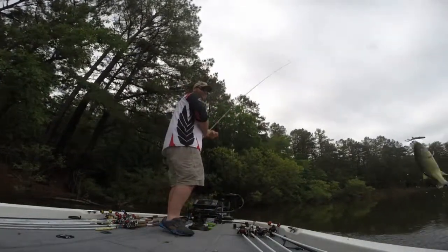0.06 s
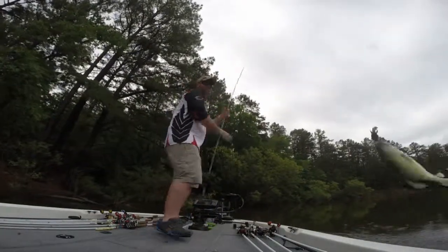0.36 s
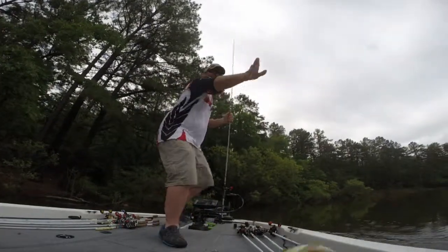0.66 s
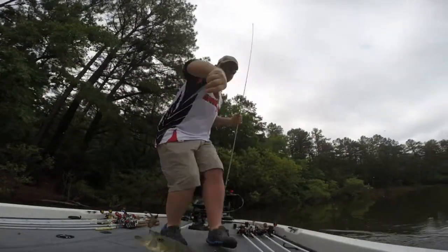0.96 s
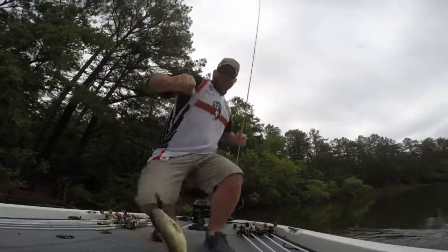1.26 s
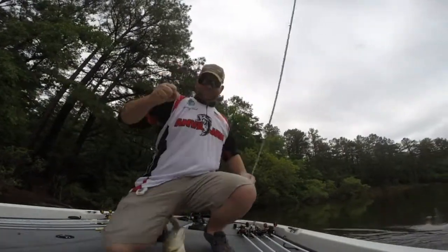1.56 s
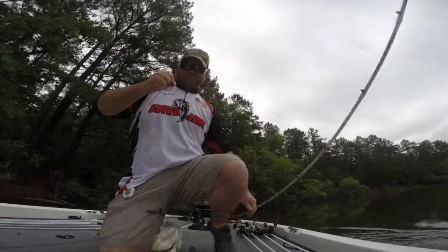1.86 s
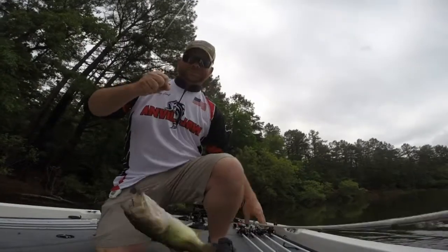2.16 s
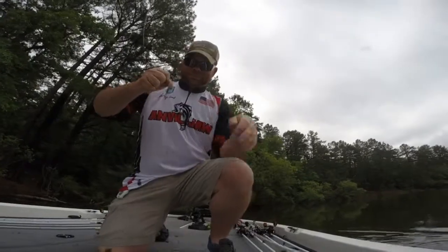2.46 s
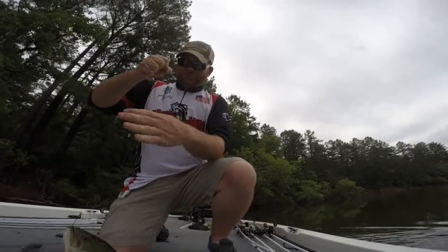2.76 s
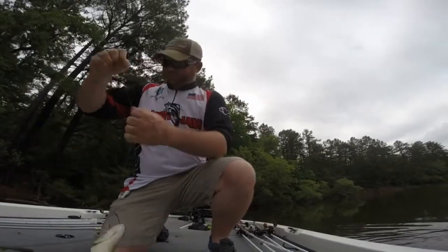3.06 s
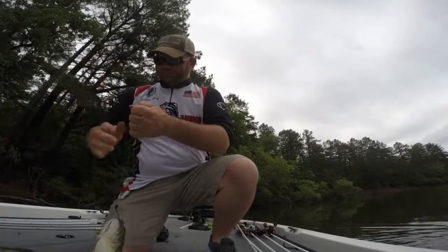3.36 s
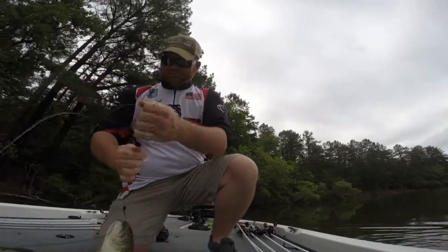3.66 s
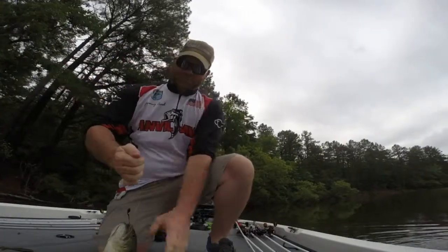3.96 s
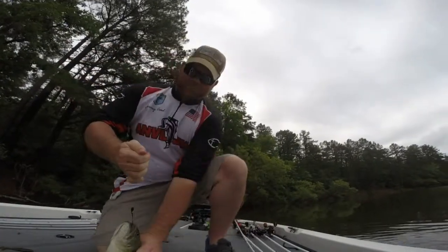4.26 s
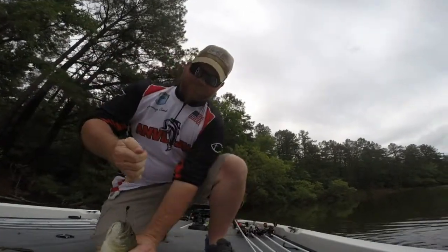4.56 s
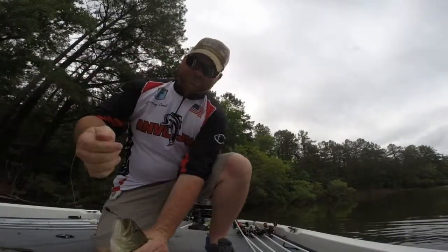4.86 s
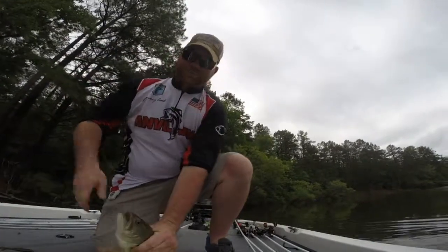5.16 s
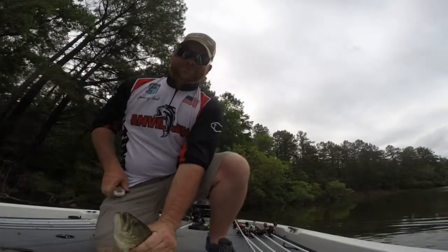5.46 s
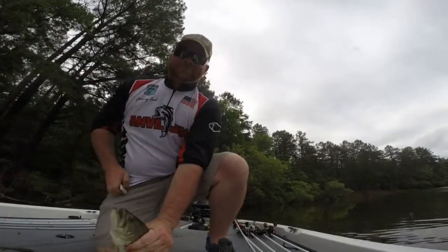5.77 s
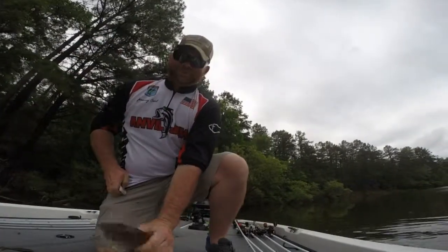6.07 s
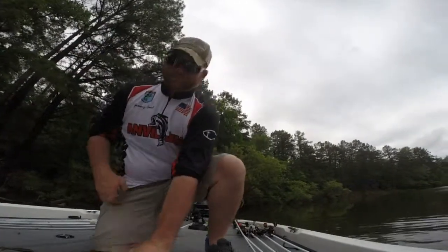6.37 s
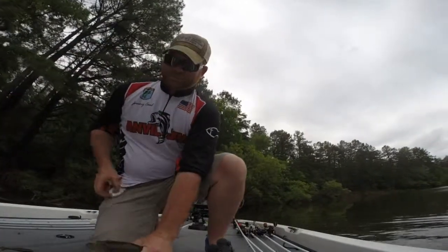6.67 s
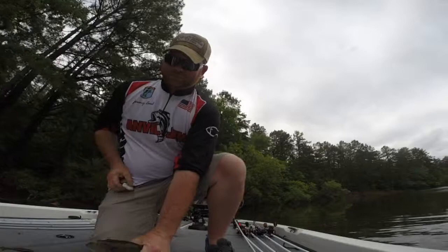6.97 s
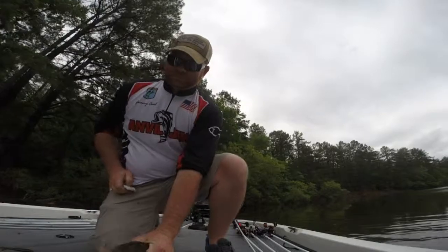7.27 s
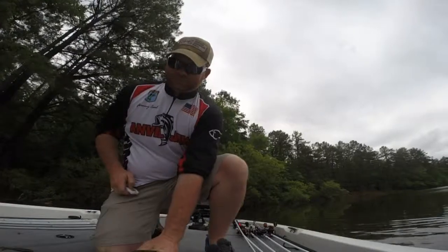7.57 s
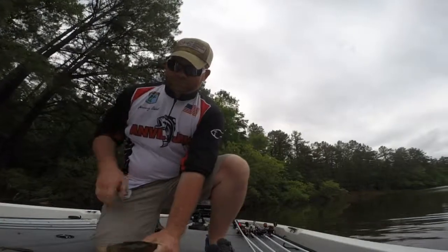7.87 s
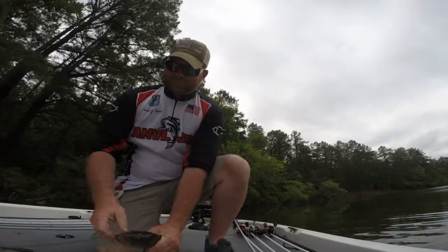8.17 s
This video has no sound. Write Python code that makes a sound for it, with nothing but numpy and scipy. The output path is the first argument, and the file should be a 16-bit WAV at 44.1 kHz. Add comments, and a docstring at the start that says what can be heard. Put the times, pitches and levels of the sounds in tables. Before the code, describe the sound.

A wet fish smacks and skids onto the carpeted deck of a small boat on a quiet lake. Feet and a knee thump on the hollow deck, then the fish flaps right against the microphone with loud, sharp slaps and scraping scales. A fishing rod clatters down. After that it is much quieter: faint clicks of hook and lure, one wet snap, and a low hull hum, with an electric motor rising softly at the end.

```python
"""On a small boat on a quiet lake, a wet bass lands on the carpeted deck and flaps against a camera.
Blows excite the hollow deck's normal modes; sliding scales and tackle make stick-slip noise.
A rod clatters down, the lure clicks and the held fish twitches. Beneath lie the hull's hum and rocking,
lake air, thin chirps, an electronic whine and an electric motor that swells softly at the end.
The camera's gain control ducks at the loudest blows and slowly recovers."""
import sys
import numpy as np
from scipy import signal
from scipy.fft import rfft, irfft
from scipy.io import wavfile
from scipy.ndimage import uniform_filter1d, minimum_filter1d, map_coordinates

SR = 44100
rng = np.random.default_rng(int(sys.argv[2]) if len(sys.argv) > 2 else 0)


def persist_wave(psi):
    """Save psi, clipped to +-1, as 16-bit WAV."""
    counts = np.round(np.clip(psi, -1, 1) * 32767).astype(np.int16)
    wavfile.write(sys.argv[1], SR, np.atleast_2d(counts).T)


N = 367353


def amp(db):
    """Decibels to amplitude ratio."""
    return 10 ** (np.asarray(db) / 20)


def unit(x):
    """Normalisation to rms 1."""
    return x / np.sqrt(np.mean(x ** 2) + 1e-20)


def clock(size):
    """Sample times in seconds."""
    return np.arange(size) / SR


def curve(rows):
    """Linear interpolation of (time [s], value) rows at every sample."""
    return np.interp(clock(N), *np.transpose(rows))


def wobble(rate):
    """Smooth random modulation: a spline through rate knots a second."""
    knots = rng.standard_normal(int(N * rate / SR) + 4)
    steps = np.linspace(0, len(knots) - 1, 8 * len(knots))
    return np.interp(clock(N) * rate, steps, map_coordinates(knots, [steps]))


def add(track, start, sound):
    """Superposition of a sound on the track from start [s]."""
    part = track[max(0, round(start * SR)):][:len(sound)]
    part += sound[:len(part)]


def impulse(spectrum, size=2048):
    """Minimum-phase impulse response of a body with these (frequency [Hz], level [dB]) rows."""
    hz, db = np.transpose(spectrum)
    gain = amp(np.interp(np.log(np.fft.rfftfreq(size, 1 / SR) + 1), np.log(hz), db))
    cepstrum = irfft(np.log(gain))
    cepstrum[1:size // 2] *= 2  # folding the cepstrum makes the response causal
    cepstrum[size // 2 + 1:] = 0
    return irfft(np.exp(rfft(cepstrum)))


def band(x, lo_hz, hi_hz):
    """Causal band-pass filtering."""
    return signal.sosfilt(signal.butter(3, [lo_hz, hi_hz], 'band', fs=SR, output='sos'), x)


def noise(spectrum):
    """Stationary noise of rms 1: white noise filtered to this spectrum."""
    body = impulse(spectrum, size=32768)
    return unit(signal.fftconvolve(rng.standard_normal(N + len(body) - 1), body, 'valid'))


def impacts(spectrum, times, levels_db, thud_db, crack_db, brighten, t60, ring_db, ring_t60,
            rise, grain_db, dulling=0, modes=110):
    """Source and filter: each contact drives a body's resonances with a crackle and a dense ring."""
    track, t, body = np.zeros(N), clock(SR // 10), impulse(spectrum)
    modes_hz = np.linspace(400, 7000, modes)[:, None]
    decay = amp(-60 * t / ring_t60 * np.maximum(1, modes_hz / 2500))  # high partials die sooner
    for start, db, thud in np.broadcast(times, levels_db, thud_db):
        clumps = amp(grain_db * np.interp(t, t[::40], rng.standard_normal(len(t[::40]))))
        crackle = rng.standard_normal(len(t)) * clumps * amp(-60 * t / t60)
        hz = modes_hz + 30 * rng.standard_normal((modes, 1))
        partials = rng.standard_normal((modes, 1)) * np.sin(2 * np.pi * hz * t) * decay
        ring = amp(ring_db) * partials.sum(0) / np.sqrt(modes / 2)
        force = (crackle + ring) * (1 - np.exp(-t / rise))
        sound = signal.fftconvolve(force, body)[:len(t)]
        crack = crack_db + brighten * (db - max(levels_db)) - dulling * thud  # slopes in dB per dB
        # each band carries the energy of 10 ms at its level
        for lo_hz, hi_hz, band_db in [(90, 950, thud), (950, 3500, 0), (3500, 16000, crack)]:
            part = band(sound, lo_hz, hi_hz)
            add(track, start, amp(db + band_db) * part / np.linalg.norm(part) * np.sqrt(SR / 100))
    return track


def friction(spectrum, middles, levels_db, lengths, treble_db, grain_db, grain_rate):
    """Stick-slip friction: surfaces catch and release in clumps; each stroke swells and fades."""
    grains = rng.standard_normal(N) * amp(grain_db * wobble(grain_rate))
    rub = unit(signal.fftconvolve(grains, impulse(spectrum))[:N])
    low_gain, high_gain = np.zeros((2, N))
    for middle, db, length, treble in np.broadcast(middles, levels_db, lengths, treble_db):
        swell = np.zeros(N)
        add(swell, middle - length / 2, amp(db) * np.hanning(round(length * SR)))
        low_gain = np.maximum(low_gain, swell)
        high_gain = np.maximum(high_gain, amp(treble) * swell)
    return low_gain * band(rub, 150, 2600) + high_gain * band(rub, 4900, 15500)


# Spectra of the hull's hum and of its rocking: (frequency [Hz], relative density [dB])
HUM_SPECTRUM = [(40, -29), (70, -20), (85, 4.5), (100, -16.5), (118, -22.5), (137, -9), (165, -30),
                (300, -52.5), (600, -92)]
ROCKING_SPECTRUM = [(5, -31), (12, -6.5), (17, -5.5), (30, -9), (55, -11.5), (110, -28), (300, -40.5),
                    (600, -67), (1500, -100)]
# Rocking under shifting weight: (time [s], level [dB])
ROCKING_LEVELS = [(0, -44), (.7, -45), (1.05, -35), (1.3, -13.5), (1.98, -38), (2.3, -25), (3.15, -22),
                  (3.5, -43), (4.3, -57.5), (8.33, -58.5)]

def hull(hum_db=-50):
    """Forced vibration: the hull hums at its low resonances and rocks as weight shifts."""
    hum = amp(hum_db) * noise(HUM_SPECTRUM)
    return hum + amp(curve(ROCKING_LEVELS)) * noise(ROCKING_SPECTRUM)


# Spectrum of open air over the water: (frequency [Hz], relative density [dB])
AIR_SPECTRUM = [(60, -32), (110, 8), (170, 0), (300, -1.5), (400, -5.5), (800, -9), (1600, -13.5),
                (3200, -20), (6000, -24.5), (8000, -29.5), (11500, -33.5), (13000, -42), (15000, -44.5),
                (16000, -65.5)]

def lake_air(level_db=-54):
    """Ambient noise: a quiet broadband rush whose level drifts slightly."""
    return amp(level_db + 0.26 * wobble(3.4)) * noise(AIR_SPECTRUM)


# Tones of the camera's electronics: (frequency [Hz], level [dB])
WHINE_TONES = [(2930, -77), (5855, -78.5), (8785, -80.5), (11715, -82), (14635, -86)]

def electronic_whine(blur_rad=1.6):
    """Phase modulation: random jitter broadens each faint tone of the electronics."""
    return sum(amp(db) * unit(np.sin(2 * np.pi * hz * clock(N) + blur_rad * wobble(110)))
               for hz, db in WHINE_TONES)


# Tones of the electric motor: (frequency [Hz], level before thrust gain [dB])
MOTOR_TONES = [(300, -53.5), (738, -65.5), (1195, -71.5)]
# The motor's thrust: (time [s], gain [dB])
THRUST_GAIN = [(0, -22.5), (7.5, -25.5), (7.72, -6.5), (8.2, -1.5), (8.33, -2)]

def motor(waver_db=1.5, wash_db=-57):
    """Line spectrum plus noise: motor tones and wash, barely there until the thrust rises."""
    tones = sum(amp(db) * unit(np.sin(2 * np.pi * hz * clock(N) + .6 * wobble(25)))
                for hz, db in MOTOR_TONES)
    waver = amp(waver_db * wobble(4.7))
    wash = amp(wash_db) * noise(AIR_SPECTRUM)
    return amp(curve(THRUST_GAIN)) * (waver * tones + wash)


# Feet, knee and fish striking the deck: (time [s], boom level [dB], knock level [dB])
DECK_BLOWS = [(.14, -27, -60), (.712, -19, -40.5), (.811, -20.5, -24.5), (.99, -21, -50.5),
              (1.036, -27, -72), (1.105, -15, -37), (1.139, -13, -40), (1.268, -7, -28.5),
              (1.309, -8, -32.5), (1.332, -9.5, -26), (1.37, -13, -31.5), (1.394, -8, -30),
              (1.456, -21, -16.5), (1.521, -23.5, -34.5), (1.622, -32.5, -42), (1.724, -10, -32),
              (2.085, -17, -44), (2.4, -4.5, -33.5), (2.665, -10.5, -29.5), (2.894, -9.5, -23),
              (3.126, -8, -20), (3.165, -5, -36), (7.68, -39.5, -44)]
# Normal modes of the hollow deck: (frequency [Hz], relative level [dB], decay time T60 [s])
DECK_MODES = [(88.08, 0.5, 0.6), (139.6, -8.5, 0.59), (201.9, -10.5, 0.15), (261, -8.5, 0.17),
              (302.2, 0, 0.17), (347, -12, 0.17), (734, -16, 0.038), (742, 2, 0.065), (748.4, -12, 0.039),
              (1038, -21, 0.056), (1220, -21.5, 0.085)]
# Dull tick through the carpet: (frequency [Hz], relative level [dB])
TICK_SPECTRUM = [(400, -40), (850, -7.5), (1300, 8), (1500, -2.5), (1750, -12.5), (2200, -3.5),
                 (2700, -13.5), (3300, -29.5), (8000, -60.5)]

def deck(heave_hz=37.88, heave_db=-3.5, heave_t60=.12, tick_db=-1, tick_t60=0.018, attack_s=0.008):
    """Modal response: blows heave the hull and boom in low modes; hard ones ring high modes and tick."""
    track, t, carpet = np.zeros(N), clock(SR), impulse(TICK_SPECTRUM)
    hz, mode_db, t60 = np.transpose(DECK_MODES)[:, :, None]
    knock_share = np.clip(np.log(hz / hz[0]) / np.log(740 / hz[0]), 0, 1)
    onset = 1 - np.exp(-t / attack_s)
    rings = np.cos(2 * np.pi * hz * t) * amp(mode_db - 60 * t / t60) * onset
    heave = np.sin(2 * np.pi * heave_hz * t) * amp(heave_db - 60 * t / heave_t60) * onset
    tick_decay = amp(-60 * t[:SR // 20] / tick_t60)
    # the thud of each flap on the camera passes through its mount into the deck
    from_flaps = [(start, db + thud - 9, db + thud - 18.5) for start, db, thud in CAMERA_FLAPS]
    for start, boom_db, knock_db in list(DECK_BLOWS) + from_flaps:
        strength = amp(boom_db + knock_share * (knock_db - boom_db + 2 * rng.standard_normal(hz.shape)))
        add(track, start, strength[:, 0] @ rings + amp(boom_db) * heave)
        tick = signal.fftconvolve(rng.standard_normal(len(tick_decay)) * tick_decay, carpet)
        add(track, start, amp(knock_db + tick_db) * tick / np.abs(tick).max())
    return track


# Fish and tackle sliding: (mid time [s], level [dB], duration [s], treble gain [dB])
CARPET_SLIDES = [(0.423, -56.5, 0.41, -23), (0.799, -26, 0.35, -3.5), (0.967, -46, 0.22, -2),
                 (1.172, -43, 0.31, -7), (2.09, -46, 0.21, 4), (2.282, -54, 0.16, 17),
                 (3.362, -17.5, 0.067, -8), (3.61, -29.5, 0.057, -23), (3.709, -44.5, 0.04, -14)]
# The wet body landing: (time [s], level [dB])
CARPET_SMACKS = [(0.709, -14), (.7544, -15), (.764, -14.5), (0.7772, -18), (.8084, -17), (.817, -15),
                 (.837, -23.5), (0.8618, -34.5), (0.9108, -27.5), (0.931, -18.5), (1.137, -35),
                 (1.1832, -38.5), (1.454, -32)]
# Wet contact with carpet: (frequency [Hz], relative level [dB])
WET_SPECTRUM = [(300, -12.5), (520, -35.5), (780, -21), (930, -23), (1120, -6.5), (1280, 3), (1520, -3.5),
                (1760, -15.5), (2170, 0.5), (2650, -11.5), (3200, -22.5), (4700, -19.5), (7500, -28.5),
                (15000, -43)]

def fish_on_carpet():
    """Soft impact and friction: the force builds over milliseconds as the wet fish smacks and skids."""
    smacks = impacts(WET_SPECTRUM, *np.transpose(CARPET_SMACKS), thud_db=-10.5, crack_db=-19,
                     brighten=-0.24, t60=0.031, ring_db=-15, ring_t60=0.083, rise=0.0055, grain_db=3.5)
    return smacks + friction(WET_SPECTRUM, *np.transpose(CARPET_SLIDES), grain_db=5, grain_rate=200)


# Clicks of hook and lure: (time [s], level [dB])
LURE_CLICKS = [(0.353, -53.5), (.671, -51), (4.0719, -50.5), (4.0947, -53), (4.2313, -49.5), (4.274, -53.5),
               (4.3347, -47), (4.3745, -54), (5.3402, -45.5), (5.3665, -52.5), (6.349, -39.5),
               (6.395, -47.5), (6.4948, -46), (6.5641, -43.5), (6.6331, -49), (7.4079, -44.5),
               (7.5416, -44.5), (7.576, -50), (7.6278, -47.5), (7.6894, -48)]
# Response of the lure's body: (frequency [Hz], relative level [dB])
LURE_SPECTRUM = [(300, -28), (900, -3), (1400, 5), (2500, 1.5), (3100, -12), (4100, -11), (4800, -8),
                 (5600, -8.5), (7500, -21.5), (10000, -20.5), (15000, -41)]
# Modes of the steel hook: (frequency [Hz], level re click [dB], decay time T60 [s])
HOOK_MODES = [(1940, -12, .04), (4080, -9, 0.078), (4820, -9, 0.044), (9900, -17, .05)]

def lure(finger_db=-14, finger_s=0.13):
    """Free vibration: the hook rings after each click of the lure, while fingers rub around it."""
    times, levels = np.transpose(LURE_CLICKS)
    track = impacts(LURE_SPECTRUM, times, levels, thud_db=-10, crack_db=-6.5, brighten=-0.17,
                    t60=0.014, ring_db=-1.5, ring_t60=.023, rise=0.0013, grain_db=5.5)
    t = clock(SR // 8)
    for start, click_db in LURE_CLICKS:
        grip = 1 + rng.normal(0, 0.038)  # the grip detunes the ring a little
        for hz, ring_db, t60 in HOOK_MODES:
            envelope = amp(click_db + ring_db + rng.normal(0, 3.8) - 60 * t / t60)
            add(track, start, envelope * np.sin(2 * np.pi * hz * grip * t))
    return track + friction(LURE_SPECTRUM, times, levels + finger_db, finger_s,
                            treble_db=2.5, grain_db=10, grain_rate=330)


# Flaps on the camera, flat ones thudding more: (time [s], level [dB], thud re level [dB])
CAMERA_FLAPS = [(2.3481, 8.5, -10), (2.3528, 4.5, -15), (2.3651, -5, -15), (2.3979, -15.5, -5),
                (2.4782, -16, -2.5), (2.585, 7.5, -9), (2.5884, 5.5, -15), (2.605, -1, -17),
                (2.62, -13.5, -12), (2.7919, -16, -11), (2.802, -8, -16.5), (2.8941, -14, 6.5),
                (2.935, -5, -5), (3.0601, -9.5, -3), (3.0675, 6, -12.5), (3.2523, -25.5, 12)]
# Scales sweeping across it: (mid time [s], level [dB], duration [s])
SCALE_SWEEPS = [(2.485, -27, 0.071), (2.727, -31, 0.13), (2.884, -31.5, 0.12), (3.028, -24, 0.079),
                (3.202, -31.5, 0.12), (3.248, -20.5, 0.041)]
# The housing when struck and when rubbed by scales: (frequency [Hz], relative level [dB])
HOUSING_SPECTRUM = [(200, -6), (400, -17), (630, -4), (1050, -19.5), (1500, -8), (2000, 0), (2450, -5.5),
                    (3400, -13), (4700, -7), (5900, -15.5), (6700, -7), (7600, -25.5), (9300, -20),
                    (15000, -49.5)]
SCALE_SPECTRUM = [(200, -3.5), (400, 2), (650, 6), (1050, -5.5), (2000, 4.5), (3300, -9), (4500, -3.5),
                  (5800, -17.5), (6700, -10), (7700, -26), (9500, -18.5), (14000, -39)]

def fish_on_camera(slip_lag_s=0.019, slip_s=.15):
    """Structure-borne sound: the fish slaps the housing, slips off and sweeps its scales across it."""
    times, db, thud = np.transpose(CAMERA_FLAPS)
    slaps = impacts(HOUSING_SPECTRUM, times, db, thud, crack_db=-12, brighten=0.17, dulling=0.32,
                    t60=0.012, ring_db=-29.5, ring_t60=.073, rise=0.00088, grain_db=-2)
    slip_db = -32 + 0.61 * (db - db.max())  # harder slaps slip louder
    slips = friction(SCALE_SPECTRUM, times + slip_lag_s, slip_db, slip_s,
                     treble_db=-7.5, grain_db=7.5, grain_rate=100)
    sweeps = friction(SCALE_SPECTRUM, *np.transpose(SCALE_SWEEPS),
                      treble_db=-4.5, grain_db=3.5, grain_rate=220)
    return slaps + slips + sweeps


# Rod and reel landing: (time [s], level [dB])
ROD_CONTACTS = [(3.3398, -16.5), (3.355, -13), (3.375, -25.5), (3.4575, -25), (3.5013, -35), (3.56, -33),
                (3.587, -15)]
# Response of rod and reel: (frequency [Hz], relative level [dB])
ROD_SPECTRUM = [(300, -17), (850, -12), (1200, 4), (1500, 5.5), (1800, -8), (2250, -6), (2900, -3.5),
                (3500, -15.5), (5800, -13.5), (8000, -23.5), (10000, -26), (15000, -48)]

def rod():
    """Repeated impact: rod and reel clatter down, the lighter touches sounding brighter."""
    return impacts(ROD_SPECTRUM, *np.transpose(ROD_CONTACTS), thud_db=-22.5, crack_db=-13.5,
                   brighten=-0.43, t60=0.022, ring_db=-25, ring_t60=0.14, rise=0.0011, grain_db=-3)


# Chirps from the bank: (mid time [s], level [dB], fundamental [Hz])
BANK_CHIRPS = [(3.81, -70.5, 3276), (7.3, -66.5, 3260), (8.175, -64.5, 3280)]

def chirps(length_s=.1):
    """Missing fundamental: harmonics 2 to 4 of a jittering, slightly arched pitch make a thin chirp."""
    track, t = np.zeros(N), clock(round(length_s * SR))
    arch = np.sin(np.pi * t / length_s)
    for middle, db, hz in BANK_CHIRPS:
        pitch = hz * (1 + 0.006 * (arch - 1) + 0.039 * rng.standard_normal(len(t)))
        phase = 2 * np.pi * np.cumsum(pitch) / SR
        harmonics = np.sin(2 * phase) + 0.42 * np.sin(3 * phase) + 0.47 * np.sin(4 * phase)
        add(track, middle - length_s / 2, amp(db) * arch * harmonics)
    return track


# The held fish snapping against the hand: (time [s], level [dB])
HAND_CONTACTS = [(6.193, -24), (6.197, -27.5)]
# Spectrum of that snap: (frequency [Hz], relative level [dB])
SNAP_SPECTRUM = [(200, -19), (600, -23.5), (950, -20), (1350, -9.5), (1900, -8.5), (2550, -0.5),
                 (3100, -18), (4700, -10), (5600, -1), (7600, -22), (9500, -17.5), (15000, -30)]

def fish_in_hand():
    """Temporal fusion: the two contacts of a twitch, milliseconds apart, are heard as one snap."""
    return impacts(SNAP_SPECTRUM, *np.transpose(HAND_CONTACTS), thud_db=-15.5, crack_db=-8,
                   brighten=-0.67, t60=0.021, ring_db=-23.5, ring_t60=0.057, rise=0.00029, grain_db=5.5)


def scene():
    """Superposition: the pressures from boat, lake, fish and tackle add at one microphone."""
    background = hull() + lake_air() + electronic_whine() + motor()
    landing = deck() + fish_on_carpet() + lure() + fish_on_camera() + rod()
    return (background + landing + chirps() + fish_in_hand())[None]


def record(dry, depth_db=16, hold_s=0.23, release_db_per_s=21, top_hz=15950, edge_hz=700):
    """Automatic gain control: gain ducks ahead of an overload, holds and recovers; peaks saturate."""
    x, recovery = dry[0], release_db_per_s * clock(N)
    level_db = 20 * np.log10(np.abs(x) + 1e-9)
    cut_db = np.clip(3 * level_db, 0, depth_db)  # 3 dB for each dB above full scale
    hold, ahead = round(hold_s * SR), SR // 80
    held_db = -minimum_filter1d(-cut_db, hold, origin=(hold - 1) // 2)
    duck_db = np.maximum.accumulate(held_db + recovery) - recovery
    early_db = np.pad(duck_db[ahead:], (0, ahead), 'edge')
    ducked = x * amp(-uniform_filter1d(early_db, ahead))
    saturated = ducked / (1 + np.abs(ducked / .95) ** 6) ** (1 / 6)
    low_pass = np.clip((top_hz - np.fft.rfftfreq(N, 1 / SR)) / edge_hz + .5, 0, 1)
    return irfft(rfft(saturated) * low_pass, N)[None]


dry = scene()
out = record(dry)
persist_wave(out)
```